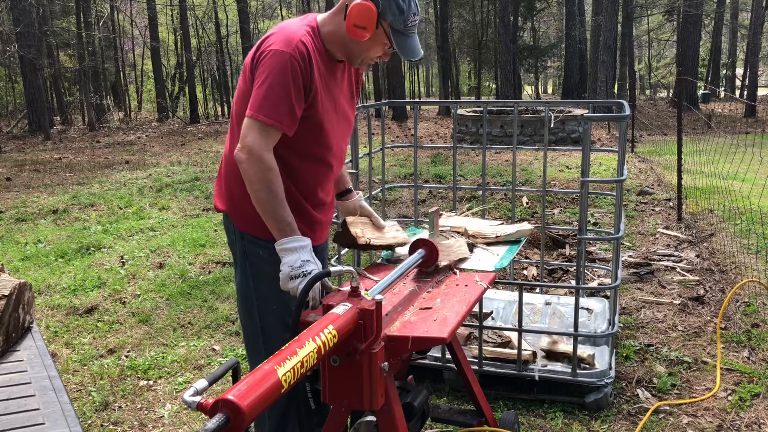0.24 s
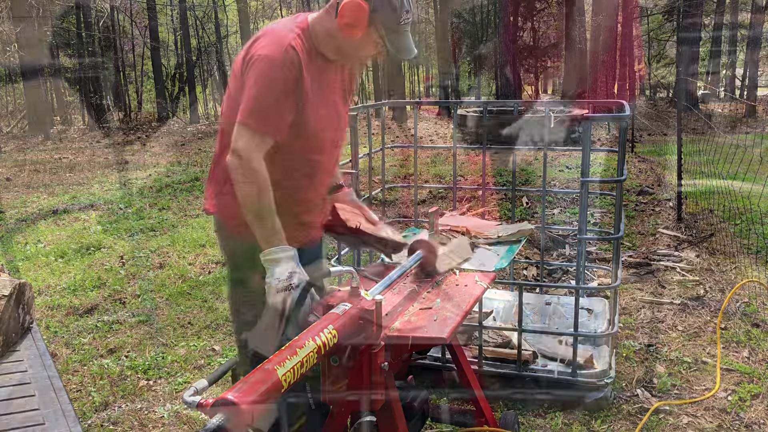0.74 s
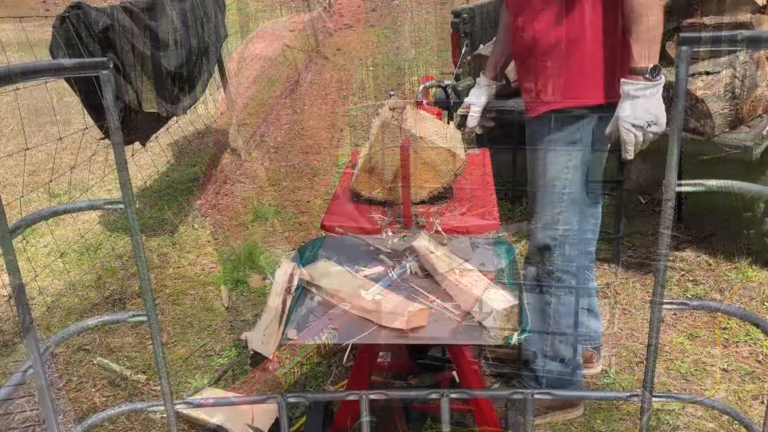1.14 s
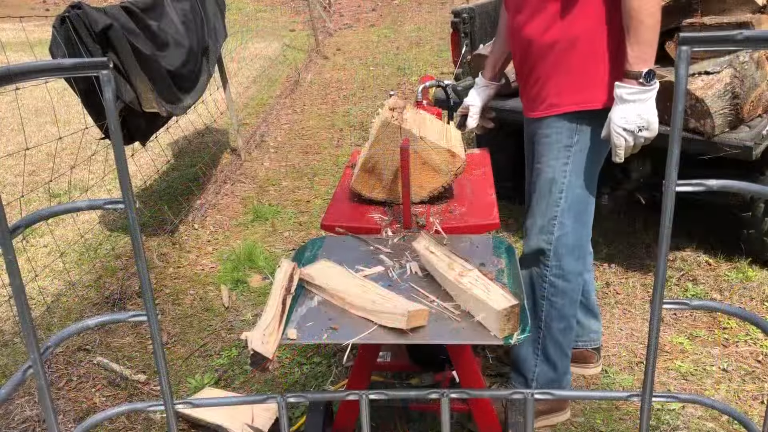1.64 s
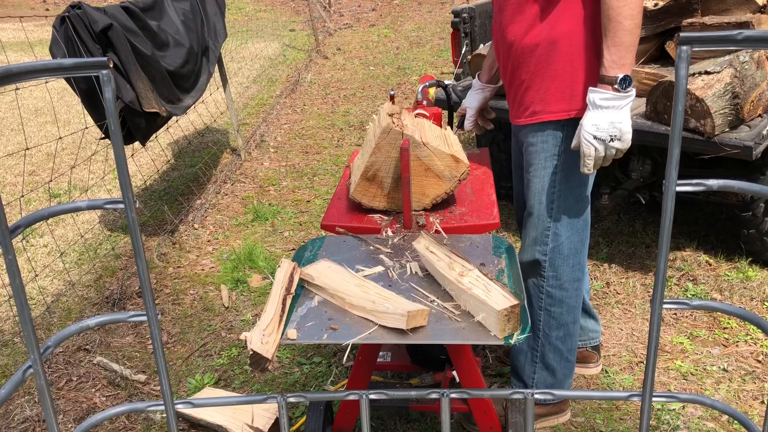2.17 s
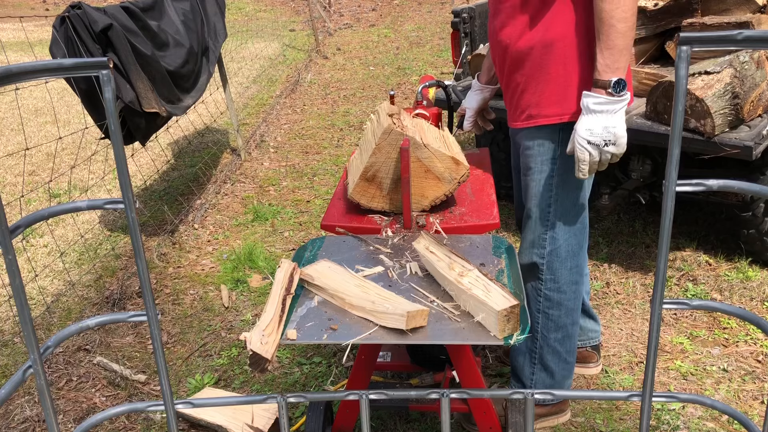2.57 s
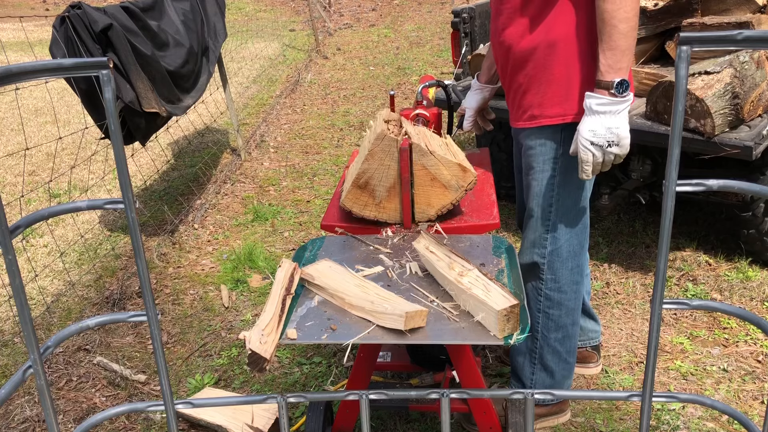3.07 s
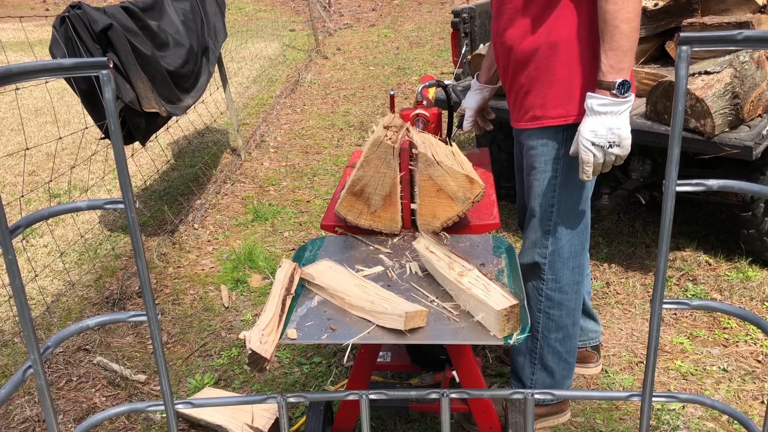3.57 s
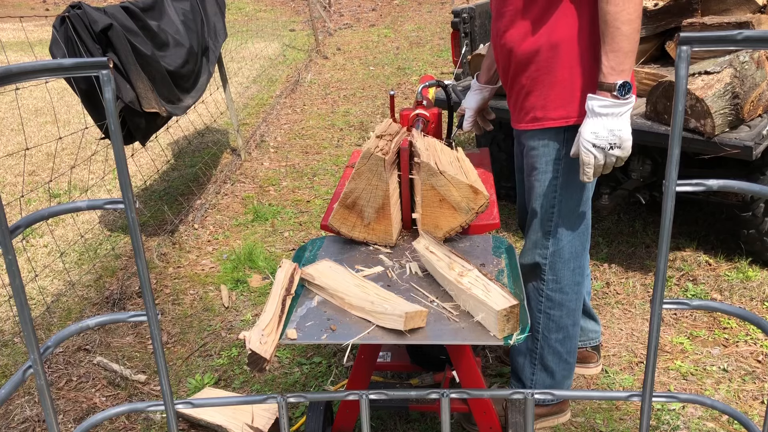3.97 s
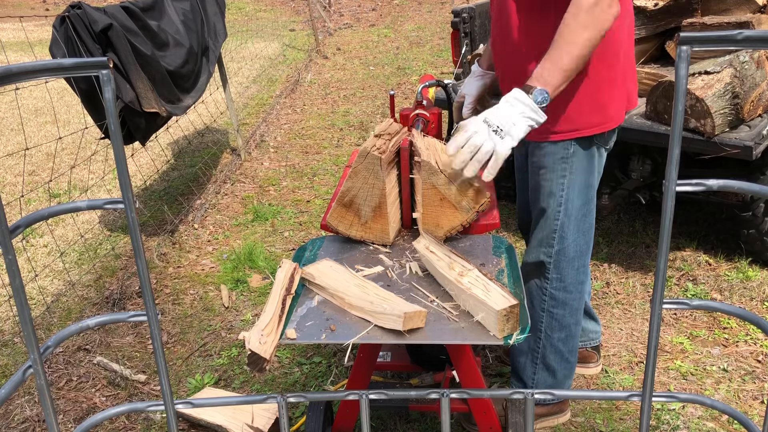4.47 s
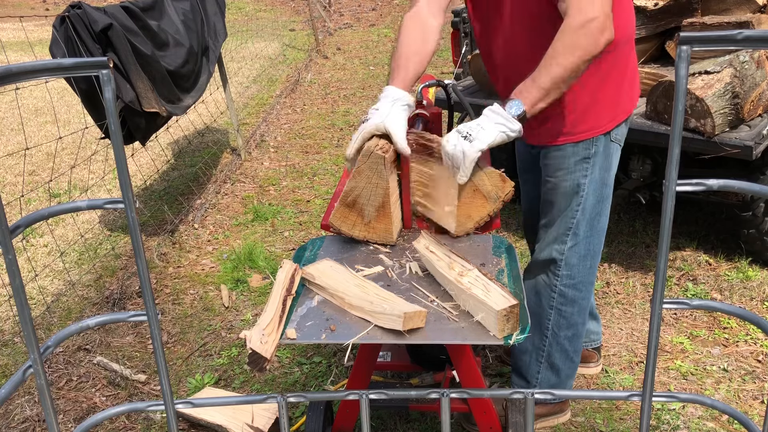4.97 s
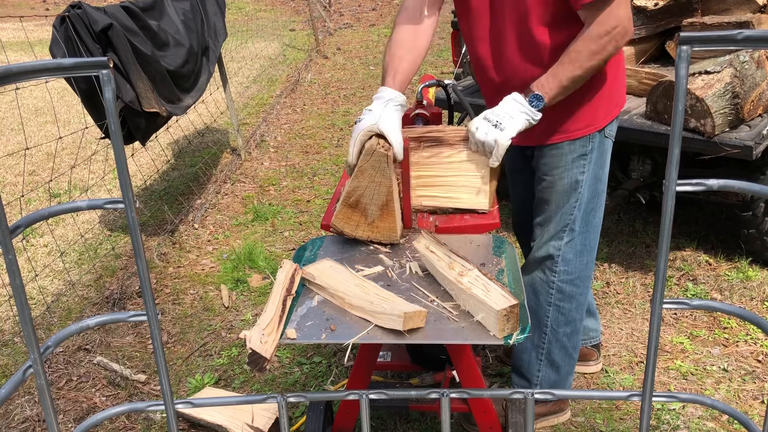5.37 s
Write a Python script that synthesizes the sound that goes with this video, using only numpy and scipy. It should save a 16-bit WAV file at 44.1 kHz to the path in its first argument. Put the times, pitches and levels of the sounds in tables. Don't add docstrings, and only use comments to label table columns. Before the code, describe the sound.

Outdoors, an electric log splitter runs throughout: a nasal gear whine around 650 Hz with higher harmonics, hissing oil and faint low air rumble. At 0.0 s split wood lands and tumbles on a resonant metal tray, rolling and bouncing until about 0.5 s, with a tiny high pin ring at 0.24 and light taps near 0.6-0.7. The motor pitch wobbles after these jolts, then steadies from 1 s as the sound shifts closer. A valve clunks at 1.8; at 2.2 the ram strikes steel with a short double clank and the pitch dips and wavers. At 2.7 the wedge bites: a heavy woody crack, a pressure surge, and sharp dry fibre snaps. Snapping continues irregularly, densest around 3.7-4.0. Low clunks come at 4.0, split thuds at 4.4, again with pitch wobble. Sparse ticks follow, a brief glove rub on bark at 5.15 with a soft scrape, and the pump runs on to 5.6.

```python
import sys
import numpy as np
from scipy import signal
from scipy.fft import rfft, irfft, next_fast_len
from scipy.io import wavfile
from scipy.ndimage import uniform_filter1d, map_coordinates

SR = 44100
rng = np.random.default_rng(int(sys.argv[2]) if len(sys.argv) > 2 else 0)


def rack_gain(trim_db):
    fader = np.asarray(trim_db, float)
    return 10 ** (fader / 20)


def master(y):
    cut = np.clip(np.atleast_2d(y).T, -1, 1)
    pcm = np.round(cut * 32767)
    wavfile.write(sys.argv[1], SR, pcm.astype(np.int16))


N = 247842
T = np.arange(N) / SR
TEETH = 11
# [f/Hz, density/dB per Hz]
CASING = [(40, -26), (430, -25.5), (620, -11.5), (1200, -13), (2600, -13.5), (3200, -11.5), (3650, -27),
          (4200, -12.5), (4850, -29.5), (5300, -19.5), (6300, -24), (8500, -18), (11500, -23.5),
          (16000, -26)]


def evened(x):
    return x / np.sqrt(np.mean(x ** 2) + 1e-20)


def curves(rows):
    t_s, *columns = np.transpose(rows)
    return [np.interp(T, t_s, column) for column in columns]


def read(points, hz):
    f_hz, value = np.transpose(points)
    return np.interp(np.log(hz + 1), np.log(f_hz + 1), value)


def coloured(x, db_at):
    size = next_fast_len(len(x))
    gain = rack_gain(db_at(np.fft.rfftfreq(size, 1 / SR)))
    return evened(irfft(rfft(x, size) * gain, size)[:len(x)])


def drift(top_hz):
    return coloured(rng.standard_normal(N), lambda hz: -40 * np.log10(1 + (hz / top_hz) ** 2))


def resonate(x, hz, width_hz):
    carrier = np.exp(2j * np.pi * np.cumsum(hz * np.ones(len(x))) / SR)
    pole = np.exp(-np.pi * width_hz / SR)
    return 2 * (carrier * signal.lfilter([1 - pole], [1, -pole], x / carrier)).real


def add(mix, t_s, sound):
    part = mix[round(t_s * SR):][:len(sound)]
    part += sound[:len(part)]


def near():
    return 1 - np.clip(2 * (1.47 - T), 0, 1)


def air():
    # [f/Hz, density/dB per Hz]
    rumble_spectrum = [(15, -66), (25, -24), (123, -6), (163, -2), (293, -23), (334, 10), (454, -55),
                       (600, -16), (780, 8), (1320, -120)]
    rumble = coloured(rng.standard_normal(N), lambda hz: read(rumble_spectrum, hz))
    return rack_gain(-58 + 0.27 * drift(15)) * rumble


def pin():
    t_s, level_db, hz, t60_s = .238, -45, 9400, .3
    out, t = np.zeros(N), T[:SR // 3]
    add(out, t_s, rack_gain(level_db - 60 * t / t60_s) * np.sin(2 * np.pi * hz * t))
    return out


def glove():
    # [t/s, level/dB, band centre f/Hz]
    stroke = [
        (5.09, -68, 4110),
        (5.14, -41.5, 6640),
        (5.17, -40, 7600),
        (5.21, -46, 8900),
        (5.24, -50, 8300),
    ]
    level_db, centre_hz = curves(stroke)
    rub = rng.standard_normal(N) * rack_gain(2.3 * drift(185))
    touching = (T > stroke[0][0]) * (T < stroke[-1][0])
    return rack_gain(level_db) * touching * evened(resonate(rub, centre_hz, 2200))


def blows():
    # [t/s, level/dB, centre f/Hz, t60/s]
    tumble_rows = [
        (0.018, -17.5, 900, 0.12),
        (0.056, -20.5, 900, 0.29),
        (.12, -27.5, 640, 0.74),
        (0.239, -27, 1230, 0.23),
        (.345, -29, 477, 0.39),
        (.607, -33, 1470, 0.079),
        (0.659, -30, 1940, 0.06),
        (5.19, -37, 2460, 0.14),
    ]
    # [t/s, level/dB, centre f/Hz]
    thud_rows = [(.03, -21.5, 320), (0.269, -38.5, 265), (0.407, -40.5, 536), (.62, -42.5, 225),
                 (.689, -38, 312), (2.207, -40, 306), (2.297, -41.5, 310), (2.679, -33, 202),
                 (2.72, -32, 347), (3.49, -53, 248), (4.389, -36.5, 151), (4.45, -37.5, 198)]
    # [t/s, level/dB, centre f/Hz, t60/s]
    crack_rows = [
        (2.28, -31, 3000, 0.048),
        (2.672, -26, 1100, 0.052),
        (2.69, -14.5, 716, 0.07),
        (3.018, -24.5, 1300, .035),
        (3.299, -33, 1550, 0.13),
        (3.455, -29, 1220, 0.05),
        (4.079, -39, 2460, 0.18),
        (4.382, -27, 1520, 0.17),
        (4.425, -22.5, 1240, 0.1),
        (4.438, -34, 1230, 0.54),
    ]
    # [t/s, level/dB, centre f/Hz, t60/s]
    clunk_rows = [
        (1.778, -32.5, 410, 0.13),
        (2.187, -26.5, 1510, .04),
        (2.193, -22, 2600, 0.11),
        (3.03, -46, 240, 0.41),
        (3.685, -31, 830, 0.038),
        (4.01, -34.5, 347, 0.18),
        (4.04, -39, 1160, 0.27),
        (4.545, -35, 2070, .11),
    ]
    # [rise/s, treble slope/dB per octave]
    kind_rows = [
        (0.015, -8),
        (0.014, -4.5),
        (0.0075, -6.5),
        (0.003, -12),
    ]
    thud_rows = [(*row, 0.3) for row in thud_rows]
    groups = zip((tumble_rows, thud_rows, crack_rows, clunk_rows), kind_rows)
    return [(*row, *kind) for rows, kind in groups for row in rows]


def knocks():
    # [f/Hz, width/Hz, level/dB]
    frame_modes = [(176, 93, -9.5), (230.5, 18, -4), (265, 13, -5.5), (330, 17.6, 5), (431, 3.6, -8),
                   (691, 22.6, 5), (900, 61, -12.5), (976.5, 25, -0.5), (1284, 11.5, -9), (1863, 62, -1),
                   (2400, 13, -81), (3393, 68, -1.5)]
    out, t = np.zeros(N), np.arange(SR // 2) / SR
    for t_s, level_db, centre_hz, t60_s, rise_s, slope_db in blows():

        def colour_db(hz):
            octaves = np.log2((hz + 1) / centre_hz)
            return np.where(hz > centre_hz, slope_db, 4.0) * octaves - 30 * np.log10(1 + 95 / (hz + 1))

        impacts = rack_gain(2.0 * rng.exponential(1, len(t) // 50).repeat(50))
        shower = coloured(rng.standard_normal(len(t)) * impacts, colour_db)
        decay = rack_gain(level_db - 60 * np.maximum(t - rise_s, 0) / t60_s)
        add(out, t_s, decay * np.minimum(t / rise_s, 1) * shower)
    ring = np.zeros(N)
    for k, (hz, width_hz, level_db) in enumerate(frame_modes):
        ring += (-1) ** k * rack_gain(level_db) * resonate(out, hz, width_hz)
    return 0.93 * out + rack_gain(7) * ring


def ram_clack():
    # [f/Hz, level/dB, t60/s]
    steel_modes = [(1003, -11, 0.08), (1100, -9, 0.77), (1360, -17, 5.0), (1843, -3.5, 0.24),
                   (2405, -1.5, 0.098), (3100, -20, 0.18), (3160, -12, 0.08), (3730, -5, 0.079),
                   (4115, 3.5, 0.031), (5350, -34, 0.092)]
    hit_s, hit_db, rebound_s = 2.1935, -20, 0.0071
    out, t = np.zeros(N), np.arange(SR // 2) / SR
    steel = np.zeros(len(t))
    for hz, level_db, t60_s in steel_modes:
        steel += rack_gain(hit_db + level_db - 60 * t / min(t60_s, .12)) * np.sin(2 * np.pi * hz * t)
    add(out, hit_s, steel * np.minimum(t / 0.0017, 1))
    add(out, hit_s + rebound_s, .5 * steel * np.minimum(t / 0.00066, 1))
    return out


def snaps():
    # [t/s, peak level/dB, centre f/Hz]
    fibre_rows = [(2.673, -19, 7000), (2.6769, -17, 8660), (2.704, -15, 8000), (2.7546, -11.5, 3300),
                  (2.7596, -13, 13400), (2.776, -10, 8360), (2.8033, -11.5, 6000), (2.8307, -16, 3510),
                  (2.85, -19, 3290), (2.8717, -8, 11360), (3.0024, -17, 7450), (3.0208, -13, 7360),
                  (3.1758, -19.5, 10400), (3.3021, -7.5, 6100), (3.3744, -19, 11900), (3.4058, -19.5, 4350),
                  (3.456, -10, 11300), (3.4599, -14, 6800), (3.6888, -12.5, 7040), (3.7564, -6.5, 6030),
                  (3.844, -12, 10500), (3.8491, -12, 14700), (3.8656, -6, 10580), (3.903, -10, 11230),
                  (3.9084, -18, 10800), (3.914, -8.5, 8150), (3.9917, -18, 6860), (4.8654, -22, 6950),
                  (5.0204, -24, 9100), (5.5478, -21.5, 6700)]
    # [t/s, peak level/dB]
    splinter_rows = [(2.6961, -21), (2.729, -20), (2.8565, -18), (2.893, -24), (2.999, -16),
                     (3.1822, -18.5), (3.233, -24), (3.347, -17), (3.3873, -20), (3.4271, -23),
                     (3.4827, -20.5), (3.506, -24), (3.601, -24.5), (3.653, -22), (3.477, -20),
                     (3.681, -21), (3.7305, -26), (3.7673, -20), (3.802, -21), (3.8081, -26), (3.8748, -19),
                     (3.8946, -19), (3.9244, -22), (3.9614, -25), (4.012, -26.5), (4.0328, -26.5),
                     (4.903, -32), (4.9554, -27), (5.104, -28)]
    snap_t60_s, scatter_t60_s, scatter_db, rise_s = 0.0056, 0.052, -29.5, 0.00035
    tear_s, tear_db = .0013, -9
    out, t = np.zeros(N), np.arange(3000) / SR
    shape = rack_gain(-60 * t / snap_t60_s) + rack_gain(scatter_db - 60 * t / scatter_t60_s)
    shape = shape * np.minimum(t / rise_s, 1)
    splinters = [(t_s, peak_db, rng.uniform(6000, 13800)) for t_s, peak_db in splinter_rows]
    for t_s, peak_db, centre_hz in fibre_rows + splinters:

        def colour_db(hz):
            low_cut_db = 12 * np.maximum(np.log2(2500 / (hz + 1)), 0)
            return -8 * abs(np.log2((hz + 1) / centre_hz)) - low_cut_db

        hiss = coloured(rng.standard_normal(len(t)), colour_db)
        tick = hiss * shape
        tick = tick / abs(tick).max()
        add(out, t_s, rack_gain(peak_db) * tick)
        tear_delay_s = tear_s * (.5 + abs(hiss[-1]))
        add(out, t_s + tear_delay_s, rack_gain(peak_db + tear_db) * tick)
    return out


def hunting():
    return evened(resonate(rng.standard_normal(N), 12.3, 8.1))


def tooth_turns():
    # [t/s, tooth rate f/Hz, oil pressure unsteadiness/0-1]
    speed_rows = [(0, 654, .3), (1.0, 654.5, .15), (1.3, 655.3, .02), (2.19, 655.2, .02), (2.27, 640, .1),
                  (2.4, 648, .1), (2.66, 651, .1), (2.72, 635, .2), (2.81, 637, .3), (2.87, 651, .3),
                  (3.5, 654.2, .4), (3.85, 653, .4), (4.0, 647, .2), (4.45, 645, .15), (4.7, 650, .4),
                  (5.0, 653.6, .4), (5.2, 653, .06)]
    # [t of first extreme/s, swing/Hz, swing rate f/Hz, dying time/s]
    jolt_rows = [
        (.368, -42, 12, .28),
        (.69, -44, 11.8, .22),
        (2.315, -36, 12.3, .25),
        (4.073, 34, 12.2, .24),
        (4.5, 30, 11.7, .2),
    ]
    tooth_hz, unsteady = curves(speed_rows)
    swing_hz, reach_hz = np.zeros(N), np.zeros(N)
    for t_s, depth_hz, rate_hz, dying_s in jolt_rows:
        onset = np.clip((T - t_s) * 4 * rate_hz + 1, 0, 1)
        fading = depth_hz * np.exp(-np.maximum(T - t_s, 0) / dying_s)
        swing_hz = (1 - onset) * swing_hz + onset * fading * np.cos(2 * np.pi * rate_hz * (T - t_s))
        reach_hz = (1 - onset) * reach_hz + onset * abs(fading)
    even = np.cumsum(tooth_hz + 4 * unsteady * hunting() + .4 * drift(10)) / SR
    return even + np.cumsum(swing_hz) / SR, even, np.exp(-reach_hz / 12), unsteady


def voicing():
    # [t/s, effort/dB, lopsided tooth pulse/dB, gear slack/0-1]
    effort_rows = [(.45, -46.5, -55.5, 0.77), (.78, -40, -47.5, 0.52), (1.24, -44, -46.5, 0.51),
                   (1.91, -29.5, -54.5, 0), (2.11, -34.5, -46.5, 0.37), (2.3, -27.5, -42.5, 0.66),
                   (2.39, -49.5, -52.5, 0.81), (2.64, -48, -51.5, 0.65), (2.82, -30.5, -46.5, 0),
                   (2.9, -43.5, -55, 0.54), (3.3, -42, -47.5, 0.53), (3.52, -34, -52.5, 0.5),
                   (3.9, -34, -49.5, 0), (4.07, -42.5, -56, 0.82), (4.43, -39, -54, 0.85),
                   (4.65, -33, -45.5, 0.4), (5.01, -42, -50, 0.43), (5.21, -36.5, -53.5, .6)]
    effort_db, second_db, slack = curves(effort_rows)
    slack = np.clip(slack, 0, 1)
    bite_s, bite_db, bite_fade_s = 2.69, 10, 0.26
    surge_db = bite_db * (T > bite_s) * np.exp(-abs(T - bite_s) / bite_fade_s)
    far = 1 - near()
    first_db = effort_db + 0.91 * surge_db
    third_db = -52 - 13.5 * slack ** 4 + 0.82 * surge_db
    rattle_db = -68.5 + 21 * slack + 7.5 * far
    rush_db = -48 - 6 * slack ** 2 + 0.05 * (effort_db + 32.5) - 2 * far + surge_db
    return [first_db, second_db, third_db, rattle_db], rush_db, slack


def gear_whine(turns, even, calm, unsteady, levels_db, slack):
    slot_order, slot_db = 43, -1.5
    rattle_db = levels_db[3]
    levels_db = levels_db + [rattle_db - 10, rattle_db - 19, rattle_db - 17, rattle_db - 19]
    held = 0.83 * slack ** 2 * near() + 0.86 * (1 - near())
    held = np.clip(held * np.minimum(2 * (1 - calm), 1), 0, 1)
    throb = 1 + 0.23 * near() * np.cos(2 * np.pi * turns / TEETH)
    whine = np.zeros(N)
    for k, level_db in enumerate(levels_db):
        ripple = unsteady * .9 / (k + 1) ** 1.4
        ripple = ripple + 0.22 * k * (1 - calm) * (.7 + .3 * near())
        flutter = 1 + ripple * (hunting() + .5j * drift(68))
        part = held * (k < 3)
        swinging = np.sqrt(1 - part ** 2) * np.exp(2j * np.pi * (k + 1) * turns)
        spin = swinging + part * np.exp(2j * np.pi * (k + 1) * even)
        tone = (flutter * spin).real / np.sqrt(1 + ripple ** 2)
        whine += 2 ** .5 * rack_gain(level_db) * (throb if k > 2 else 1) * tone
    slots = np.cos(2 * np.pi * slot_order / TEETH * even)
    return whine + rack_gain(rattle_db + slot_db) * near() * (1 - calm) * slots


def revolution(size=4096):
    # [shaft order, level/dB]
    mesh_orders = [(55, -29), (66, -31), (77, -30), (88, -20), (99, -23), (110, -43), (121, -25),
                   (132, -27), (143, -25), (154, -27), (165, -34), (176, -37), (187, -43), (198, -43),
                   (209, -44), (220, -37), (231, -29), (242, -45), (253, -42), (264, -54)]
    # [shaft order, level/dB]
    side_orders = [(9, -38), (10, -12), (12, -26), (13, -30), (18, -28), (19, -23), (21, -25), (23, -29),
                   (24, -25), (30, -23), (32, -29), (34, -28), (43, -16), (45, -27), (46, -25), (72, -28),
                   (122, -27), (144, -29), (177, -32)]
    order = np.arange(size // 2 + 1)
    level_db = read(CASING, order * 63.3) - 21 + 4.9 * rng.standard_normal(len(order))
    phase = 2 * np.pi * rng.random(len(order))
    for k, mesh_db in mesh_orders:
        k = round(k)
        lines = k + np.arange(-2, 3)
        level_db[lines] = np.maximum(level_db[lines], mesh_db - 9 * abs(lines - k))
        phase[lines] = phase[k] + np.pi * (lines == k - 1)
    for k, side_db in side_orders:
        level_db[round(k)] = side_db
    whine_order = (order % TEETH == 0) & (order < 5 * TEETH)
    level_db[(order < 1) | (order > 275) | whine_order] = -200
    return size / 2 ** .5 * irfft(rack_gain(level_db) * np.exp(1j * phase))


def oil_rush(turns, calm):
    # [f/Hz, width/Hz, level/dB]
    valve_modes = [(7280, 210, 0.5), (10270, 96, 1), (13600, 69, -11)]
    beat = 1 + 0.064 * np.cos(2 * np.pi * turns / TEETH) + 0.035 * np.cos(2 * np.pi * turns)
    oil = coloured(rng.standard_normal(N) * beat, lambda hz: read(CASING, hz)) * rack_gain(1.1 * drift(21))
    oil = oil - 0.43 * (1 - calm) * resonate(oil, 9200, 6600)
    return oil + sum(rack_gain(level_db) * resonate(oil, hz, width_hz) for hz, width_hz, level_db in valve_modes)


def pump():
    # [t/s, share of steady orders/0-1]
    grip_rows = [(0, .4), (.7, .6), (1.2, .9), (2.2, .9), (2.7, .42), (4.0, .42), (4.7, .33), (5.62, .33)]
    # [harmonic, level re rush/dB]
    shrill_rows = [(9, -17), (16, -18), (21, -14)]
    # [delay/s, gain]
    echo_rows = [(.0031, 1), (.0074, 0.089), (0.0148, .3), (.021, 0.022)]
    turns, even, calm, unsteady = tooth_turns()
    levels_db, rush_db, slack = voicing()
    whine = gear_whine(turns, even, calm, unsteady, levels_db, slack)
    turn = revolution()
    orders = map_coordinates(turn, [turns / TEETH % 1 * len(turn)], order=3, mode="grid-wrap")
    oil = oil_rush(turns, calm)
    share = curves(grip_rows)[0] * (0.46 + 0.51 * calm)
    fine = rack_gain(rush_db + 15) * share * orders
    fine = fine + rack_gain(rush_db + 6) * np.sqrt(1 - share ** 2) * oil
    for k, level_db in shrill_rows:
        fine += rack_gain(rush_db + level_db) * np.cos(2 * np.pi * k * turns)
    tray_hum = rack_gain(14) * resonate(oil * rack_gain(rush_db), 331.5, 9)
    heard = whine + fine + tray_hum
    upper = whine - resonate(whine, 470, 1530)
    for delay_s, gain in echo_rows:
        add(heard, delay_s, gain * near() * upper)
    return heard


def scene():
    return (air() + pin() + glove() + knocks() + ram_clack() + snaps() + pump())[None]


def band_limit(x):
    return signal.sosfilt(signal.butter(12, 16970, fs=SR, output="sos"), x)


def record(dry):
    edge = signal.firwin(801, 15720, window=("kaiser", 9), fs=SR)
    wide = signal.firwin(801, 16800, window=("kaiser", 9), fs=SR)
    top = signal.oaconvolve(dry, (wide - edge)[None], "same")
    loud = uniform_filter1d(top ** 2, 300) > rack_gain(-43) ** 2
    opening = uniform_filter1d(uniform_filter1d(1. * loud, 200), 200)
    mix = signal.oaconvolve(dry, edge[None], "same") + .4 * top * opening
    return band_limit(mix)


dry = scene()
out = record(dry)
master(out)
```